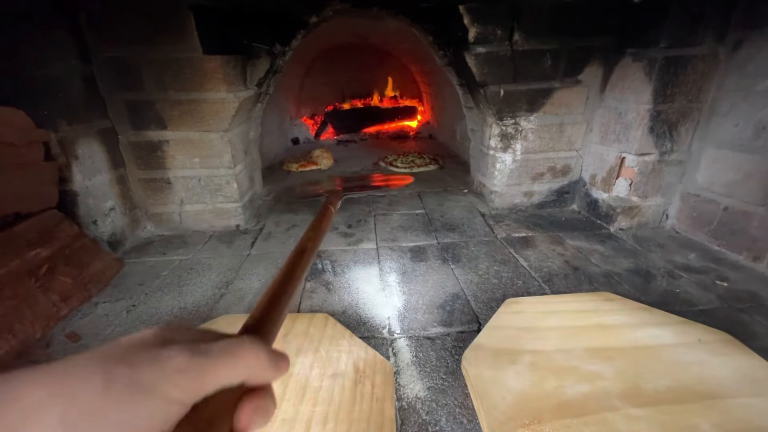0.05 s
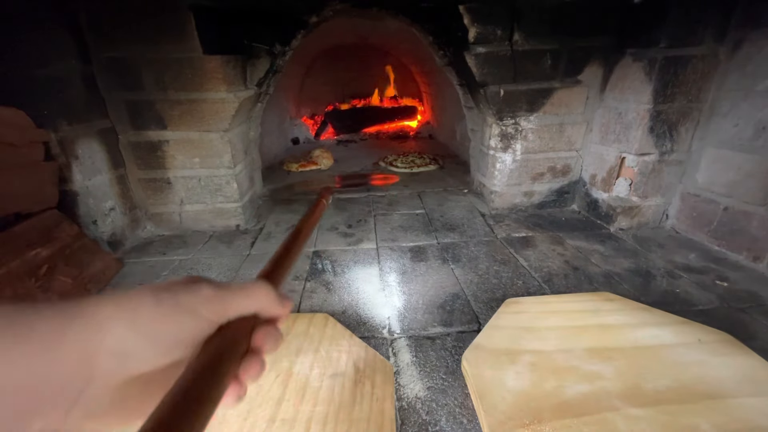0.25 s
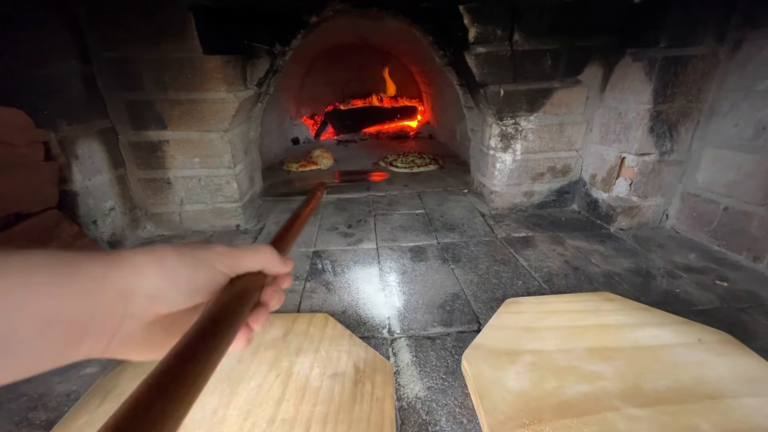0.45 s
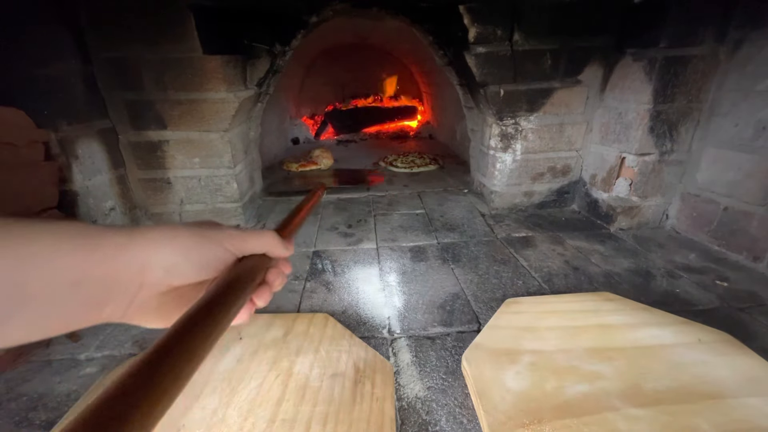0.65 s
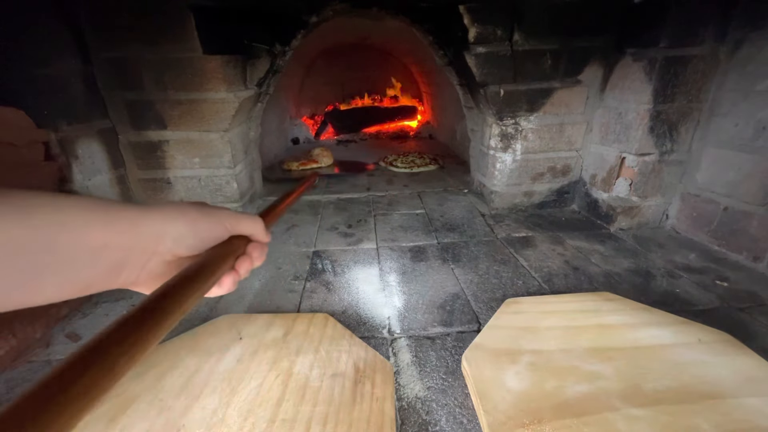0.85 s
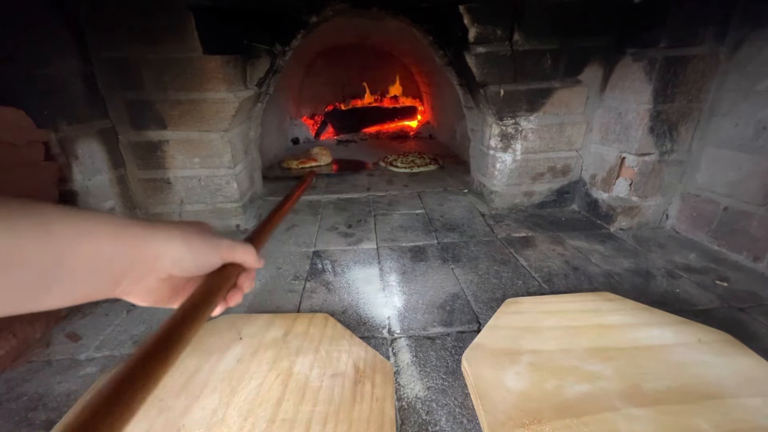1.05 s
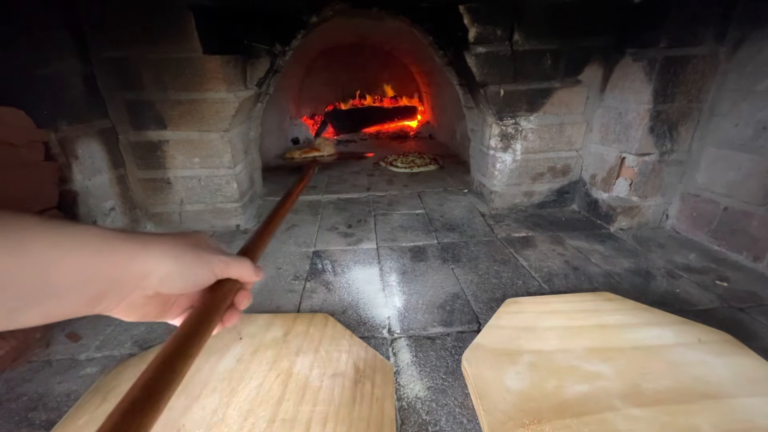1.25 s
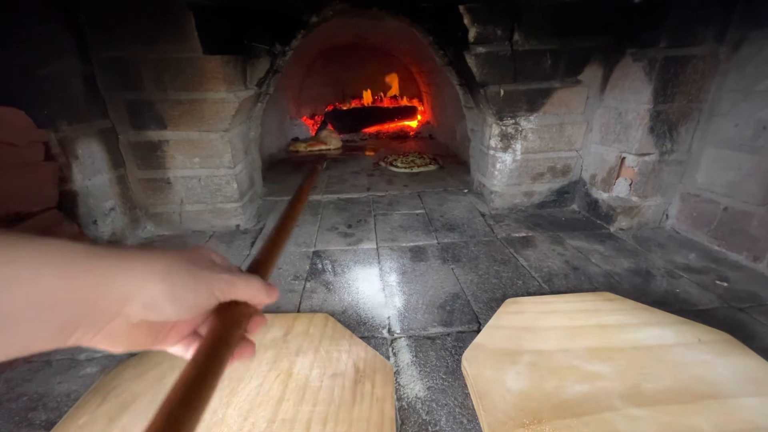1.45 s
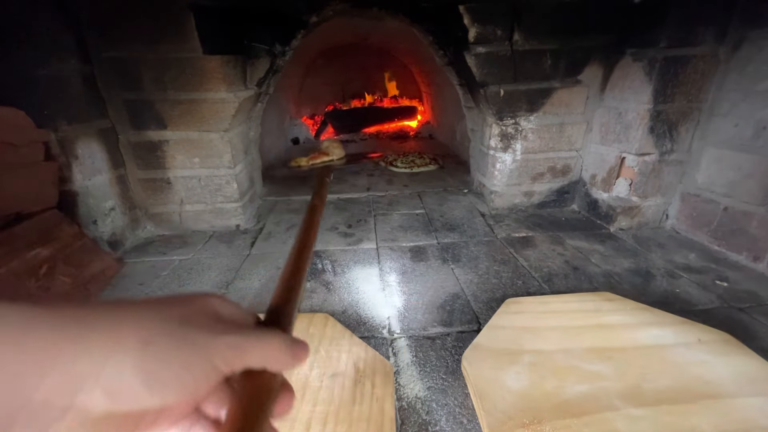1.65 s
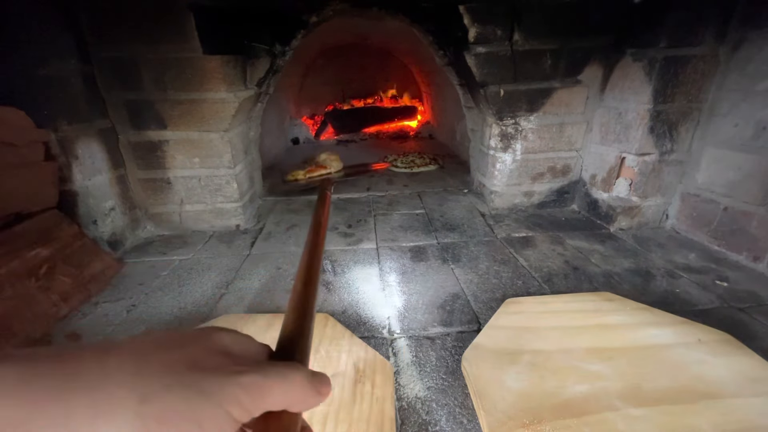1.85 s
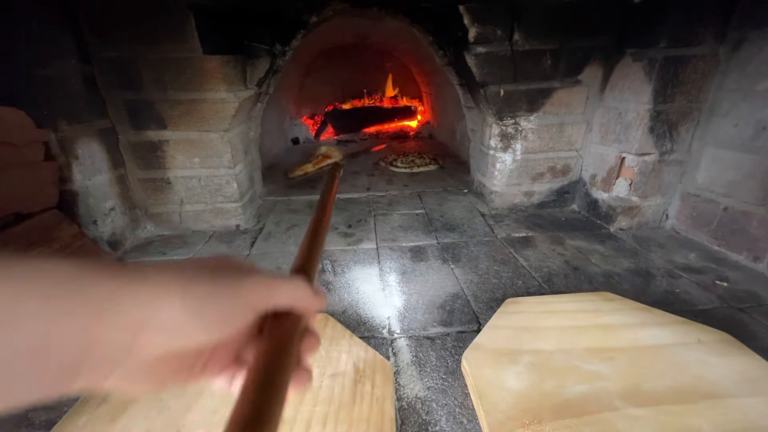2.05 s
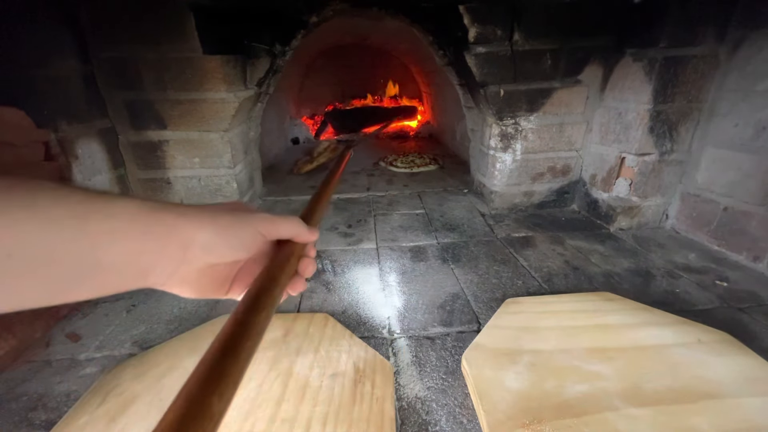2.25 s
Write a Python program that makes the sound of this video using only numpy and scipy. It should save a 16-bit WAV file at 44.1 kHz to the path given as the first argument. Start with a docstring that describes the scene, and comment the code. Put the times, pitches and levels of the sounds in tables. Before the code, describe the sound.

A metal pizza peel scrapes, knocks and clinks on a brick oven's stone floor.

```python
"""In a brick oven, a long-handled metal peel is pushed over the stone floor and rattles over the joints.
It slips under the dough, knocks down once, scrapes again as it turns a pizza, and clinks twice.
Friction on grit drives the resonances of the thin blade; impacts set blade and handle vibrating freely.
The vault reverberates briefly and the fire rumbles faintly."""
import sys
import numpy as np
from scipy import signal
from scipy.fft import rfft, irfft, next_fast_len
from scipy.io import wavfile
from scipy.ndimage import map_coordinates

SR = 44100
rng = np.random.default_rng(int(sys.argv[2]) if len(sys.argv) > 2 else 0)


def dump_mix(stems):
    """Bounce the given channels to the path in sys.argv[1] as a 16-bit WAV at rate SR."""
    frames = np.atleast_2d(stems).T  # one column per channel
    limited = np.clip(frames, -1, 1)  # hard clip at full scale
    pcm = np.round(limited * 32767).astype(np.int16)
    wavfile.write(sys.argv[1], SR, pcm)


N = 105840

# Strokes of the peel. Each row: time in seconds, hiss level in dB, grinding level in dB.
PUSH_STROKE = [(.12, -65, -63), (.128, -38, -46), (.155, -44.5, -46.5), (.185, -37.5, -44),
               (.235, -34.5, -47.5), (.255, -40, -42.5), (.285, -36, -44), (.335, -35.5, -41),
               (.36, -39, -47), (.415, -35, -37), (.43, -25, -35.5), (.452, -31, -29), (.466, -23.5, -27.5),
               (.492, -32, -33), (.566, -35.5, -40.5), (.612, -39, -37.5), (.66, -29.5, -30),
               (.72, -44, -50), (.8, -100, -100)]
UNDER_DOUGH_STROKE = [(.69, -65, -41), (.715, -41.5, -36.5), (.745, -35, -41.5), (.8, -39.5, -43),
                      (.9, -46, -49.5), (.93, -51, -58), (.96, -50.5, -49), (1.02, -55, -65.5),
                      (1.1, -53.5, -59), (1.19, -60, -62), (1.24, -58, -67), (1.3, -66.5, -97),
                      (1.5, -70, -76)]
TURN_STROKE = [(1.87, -66, -60), (1.895, -58, -60.5), (1.93, -55, -54), (1.964, -40, -47),
               (1.986, -42.5, -52.5), (2.038, -33, -46), (2.054, -40, -40.5), (2.075, -35, -38),
               (2.096, -47, -42.5), (2.15, -44, -54), (2.18, -56, -57), (2.205, -38, -47),
               (2.255, -65.5, -58.5), (2.32, -60, -62.5), (2.4, -62.5, -74)]
# Spectra of the hiss on stone and under dough. Each row: frequency in Hz, relative level in dB.
STONE_HISS = [(100, -61), (1500, -19.5), (2600, -2.5), (3500, -0.5), (4600, -1.5), (5500, -1), (7200, -5),
              (9200, -3.5), (10500, -8), (12300, -11.5), (14500, -13.5), (16000, -9.5)]
DOUGH_SWISH = [(100, -28), (1500, -17), (2600, 3.5), (3500, -0.5), (4200, 0.5), (5800, 0), (7300, -1),
               (9000, 2.5), (10500, -5), (12300, -9), (16000, -4.5)]
# Resonances of the blade lying flat, loaded with dough, and turning the pizza with its edge.
# Each row: frequency in Hz, bandwidth in Hz, strength in dB.
FLAT_BLADE = [(570, 35, 4), (1080, 35, 7), (1150, 45, 9), (1230, 50, 6), (1630, 45, 7), (1910, 45, 4),
              (2230, 40, 3), (3030, 35, 4), (3240, 40, 5), (3480, 130, 4), (4260, 40, 3), (4880, 45, 6),
              (5610, 45, 6), (8310, 90, 4)]
LOADED_BLADE = [(517, 48, 2.5), (780, 58, -4), (1327, 39, 4), (1657, 29, 2), (2290, 28, -7), (3190, 33, -1),
                (3480, 50, 2), (3700, 40, 4), (6600, 43, -1)]
EDGE_BLADE = [(544, 25, 11.4), (1190, 35, 3.9), (1594, 68, 4.5), (2136, 13, 4.2), (2666, 28, 8.8),
              (2970, 48, 2.5), (3500, 120, 5), (4240, 26, 4.2), (6100, 31, 2.7), (9600, 120, 2.1)]
def strokes():
    """Contact and load set a plate's resonances, so each of the three strokes has its own timbre."""
    push = scrape(PUSH_STROKE, STONE_HISS, FLAT_BLADE)
    slip_under = scrape(UNDER_DOUGH_STROKE, DOUGH_SWISH, LOADED_BLADE)
    turn = scrape(TURN_STROKE, STONE_HISS, EDGE_BLADE)
    return push + slip_under + turn

# Spectrum of the grinding. Each row: frequency in Hz, relative level in dB.
GRIND_SPECTRUM = [(30, -6), (80, 1), (130, -5.5), (250, -6), (420, -11.5), (560, -6), (850, -5.5),
                  (1150, -5), (1900, -2.5), (2600, -3.5), (4000, -24.5), (16000, -51)]
def scrape(stroke, hiss_spectrum, resonances, judder_db=1, judder_per_s=120):
    """Forced vibration: grit drives the pressed blade, and the juddering contact modulates the level."""
    times, hiss_db, grind_db = np.transpose(stroke)
    envelope = lambda db: amp(np.interp(np.arange(N) / SR, times, db, left=-120))
    hiss = envelope(hiss_db) * coloured(grit(), hiss_spectrum, resonances)
    grind = envelope(grind_db) * coloured(grit(), GRIND_SPECTRUM, resonances)
    return (hiss + grind) * amp(judder_db * wobble(judder_per_s))

def grit(grains_per_s=16000, spread_db=3):
    """Shot noise: grains under the blade give tiny, independent impulses."""
    hits = rng.random(N) < grains_per_s / SR
    return hits * rng.choice([-1, 1], N) * amp(spread_db * np.clip(noise(), -2, 2))

# Blows on the stone. Each row: start in seconds, rise in seconds, thud level in dB, handle focus in Hz,
# clack level in dB, clink level in dB, blade focus in Hz, ring level in dB.
IMPACTS = [(.120, 0.00054, -44.5, 136, -38.5, -39, 1700, -60),
           (.6185, 0.0024, -35, 132, -27.5, -20.5, 11100, -29),
           (0.633, 0.0034, -30.5, 132, -31, -45, 1170, -44),
           (.657, 0.0023, -31.5, 132, -30, -36, 2000, -40),
           (.681, 0.0047, -56, 350, -33.5, -20, 1970, -23.5),
           (0.689, 0.0037, -55, 350, -52, -29, 7700, -23.5), (1.106, 0.0018, -28, 154, -24, -31, 1250, -44),
           (1.120, 0.00053, -29.5, 132, -36, -28, 8650, -32),
           (1.786, .002, -54.5, 213, -60, -75, 1200, -76), (2.063, 0.0015, -59, 234, -40, -48, 2640, -37),
           (2.071, .003, -37, 216, -39, -57, 1240, -51), (2.104, .001, -36.5, 546, -59, -28, 9360, -28),
           (2.185, 0.0067, -49.5, 130, -60, -43, 5270, -36.5)]
# Modes of handle and free blade. Each row: frequency in Hz, relative level in dB, T60 in seconds.
HANDLE_MODES = [(132, 3, .19), (203, -5, .14), (235, -7, .14), (268, -8, .13), (352, -9, .14),
                (506, -5, .22), (630, -10, .16)]
BLADE_MODES = [(1150, -6, .18), (1260, -6, .16), (1810, -5, .12), (2240, -6, .12), (3190, -6, .22),
               (3400, -3, .17), (4120, -6, .15), (4720, -7, .09), (5889, -2, .17), (7720, -6, .08),
               (8400, -4, .07), (8802, 0, .11), (9220, -8, .14), (10460, -7, .11), (11100, -5, .07)]
# Resonances of the socket. Each row: frequency in Hz, bandwidth in Hz, strength in dB.
SOCKET_RESONANCES = [(757, 51, 8.5), (844, 14, 2.5), (980, 25, -17), (1166, 19, 3.5), (1288, 45, 6),
                     (1549, 41, 7.5), (1774, 29, 13.5), (2113, 36, -2)]
# Spectra of the socket's clack and the blade's clink. Each row: frequency in Hz, relative level in dB.
CLACK_SPECTRUM = [(30, -22), (100, -30), (220, 6), (420, -1.5), (760, -1), (1300, -1.5), (2200, -6.5),
                  (3200, -3.5), (6000, -33), (16000, -41)]
CLINK_SPECTRUM = [(200, -52), (1200, -23), (2200, 0), (3400, -3), (5400, -3.5), (6900, -8.5), (8600, -5.5),
                  (10500, -11.5), (12300, -13.5), (14500, -17.5), (16000, -8.5)]
def impacts(contact_s=0.0057, clack_t60_s=0.092, clink_t60_s=0.063):
    """Impulse excitation: the handle thuds, the socket clacks, the blade clinks and rings."""
    out, size = np.zeros(N + SR), SR // 2
    t = np.arange(size) / SR
    clack_noise = coloured(noise(), CLACK_SPECTRUM, SOCKET_RESONANCES)
    clink_noise = coloured(grit(), CLINK_SPECTRUM)
    for start_s, rise_s, thud_db, handle_hz, clack_db, clink_db, blade_hz, ring_db in IMPACTS:
        start = round(start_s * SR)
        attack = np.minimum(t / rise_s, 1)
        decay_s = np.maximum(t - rise_s - contact_s, 0)
        clack = amp(clack_db - 60 * decay_s / clack_t60_s) * np.roll(clack_noise, -start)[:size]
        clink = amp(clink_db - 60 * decay_s / clink_t60_s) * np.roll(clink_noise, -start)[:size]
        blade = amp(ring_db) * ring(paired(favoured(BLADE_MODES, blade_hz)), t)
        thud = amp(thud_db) * ring(favoured(HANDLE_MODES, handle_hz), t)
        out[start:start + size] += attack * (thud + clack + clink + blade)
    return out[:N]

def ring(modes, t):
    """Free vibration is a sum of damped sinusoids, here scaled to rms 1 before decay."""
    hz, db, t60 = np.transpose(modes)[:, :, None]
    gain = amp(db + rng.standard_normal(db.shape))
    waves = gain * amp(-60 * t / t60) * np.sin(2 * np.pi * hz * t)
    return waves.sum(axis=0) / np.sqrt(np.sum(gain ** 2) / 2)

def favoured(modes, focus_hz, boost_db=11, width_octaves=.3):
    """Selective excitation: the point of contact favours the modes near a focus frequency."""
    return [(hz, db + boost_db * np.exp(-abs(np.log2(hz / focus_hz)) / width_octaves), t60)
            for hz, db, t60 in modes]

def paired(modes, max_detune=.004):
    """Mode splitting: a thin plate's modes come in close pairs that beat."""
    return [(hz * (1 + side * max_detune * rng.random()), db, t60)
            for hz, db, t60 in modes for side in (-1, 1)]

# Spectrum of the slipping handle. Each row: frequency in Hz, relative level in dB.
RUB_SPECTRUM = [(100, -25), (380, -3), (580, 1), (900, -3), (1300, -3), (2200, -18), (8000, -40),
                (16000, -55)]
def handle_rub(start_s=1.024, rise_s=.016, length_s=0.1, level_db=-45):
    """Sliding friction: the handle slips softly just before the big knock."""
    envelope = np.interp(np.arange(N) / SR - start_s, [0, rise_s, length_s], [0, 1, 0])
    return amp(level_db) * envelope * coloured(noise(), RUB_SPECTRUM)

# Reverberation of the oven. Each row: frequency in Hz, T60 in seconds.
VAULT_DECAY = [(100, 0.2), (1500, 0.13), (12000, 0.069)]
def vault(source, level_db=-11):
    """Reverberation: reflections from the brick decay exponentially, the treble fastest."""
    hz, t, spectra = signal.stft(rng.standard_normal(SR // 2), SR, nperseg=256)
    decay = amp(-60 * t / along(VAULT_DECAY, hz)[:, None])
    tail = signal.istft(spectra * decay, SR, nperseg=256)[1]
    return amp(level_db) * signal.fftconvolve(source, tail / np.linalg.norm(tail))[:N]

# Spectrum of the fire. Each row: frequency in Hz, relative level in dB.
FIRE_SPECTRUM = [(15, -30), (25, -9), (45, -2), (69, -7), (101, -1), (126, -10), (340, -17), (380, -21),
                 (800, -21), (1200, -23), (2100, -29), (2700, -33), (7100, -35), (10000, -38), (15500, -44)]
def fire(rumble_db=-56, hum_db=-61, hum_hz=99.8, hum_width_hz=18):
    """Combustion noise: a broad, steady rumble, with a narrow band heard as a wavering hum."""
    hum = unit(filtered(noise(), lambda f: np.exp(-((f - hum_hz) / hum_width_hz) ** 2)))
    return amp(rumble_db) * coloured(noise(), FIRE_SPECTRUM) + amp(hum_db) * hum

def coloured(x, spectrum, resonances=()):
    """Source and filter: a broad spectrum and second-order resonances shape x, scaled to rms 1."""
    def response(f):
        peaks = sum(amp(db) * 1j * f * width / (hz * hz - f * f + 1j * f * width)
                    for hz, width, db in resonances)
        return amp(along(spectrum, f)) * (1 + peaks)
    return unit(filtered(x, response))

def filtered(x, response):
    """Linear filtering multiplies the spectrum by a frequency response."""
    size = next_fast_len(N + SR // 2)
    return irfft(rfft(x, size) * response(np.fft.rfftfreq(size, 1 / SR)), size)[:N]

def along(points, hz):
    """Interpolation of (Hz, value) points on a logarithmic frequency axis."""
    frequencies, values = np.transpose(points)
    return np.interp(np.log(hz + 1), np.log(frequencies + 1), values)

def wobble(knots_per_s):
    """Spline interpolation of random knots gives a smooth fluctuation."""
    knots = rng.standard_normal(int(N * knots_per_s / SR) + 4)
    return map_coordinates(knots, [np.arange(N) * knots_per_s / SR])

def noise():
    """Gaussian white noise."""
    return rng.standard_normal(N)

def amp(db):
    """Decibels to amplitude ratio."""
    return 10 ** (np.asarray(db) / 20)

def unit(x):
    """Normalisation to rms 1."""
    return x / np.sqrt(np.mean(x ** 2) + 1e-20)

def scene():
    """Superposition: the peel, its reverberation and the fire add in one channel."""
    peel = strokes() + impacts() + handle_rub()
    return (peel + vault(peel) + fire())[None]

def record(dry, cutoff_hz=15800):
    """Band limiting: the microphone passes nothing above its cutoff."""
    return filtered(dry[0], lambda hz: hz < cutoff_hz)[None]

dry = scene()
out = record(dry)
dump_mix(out)
```